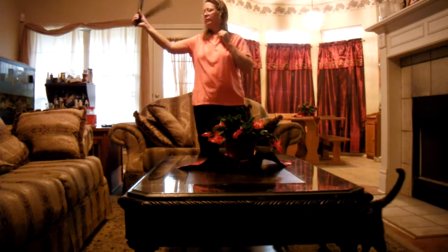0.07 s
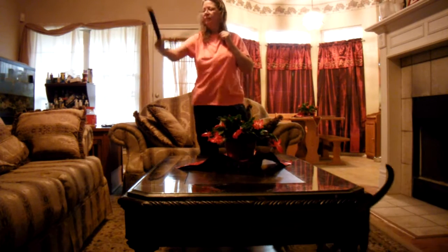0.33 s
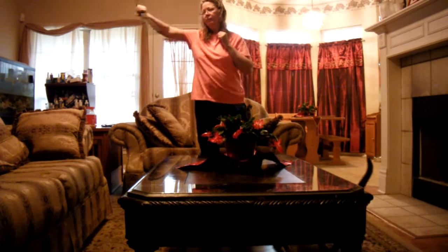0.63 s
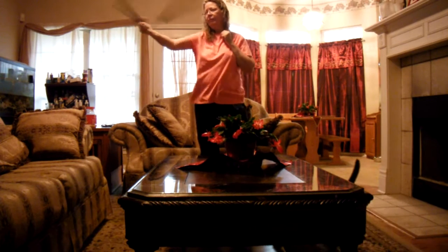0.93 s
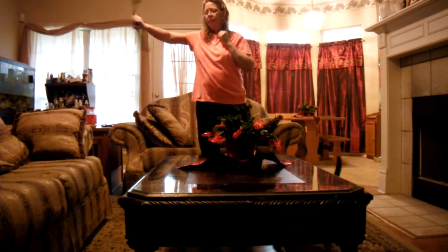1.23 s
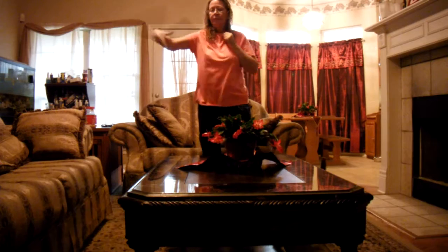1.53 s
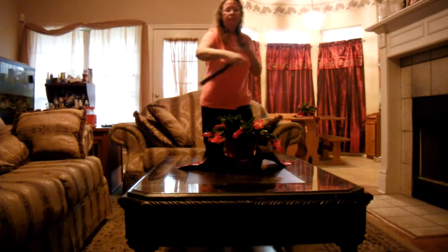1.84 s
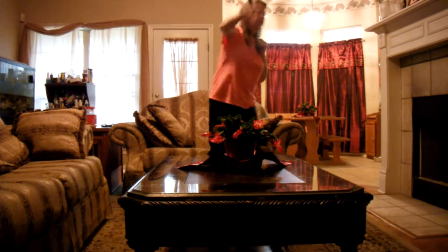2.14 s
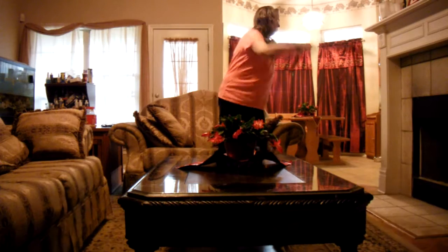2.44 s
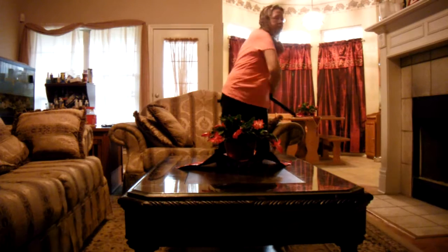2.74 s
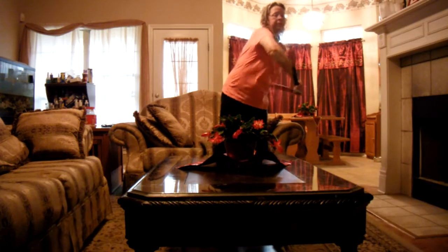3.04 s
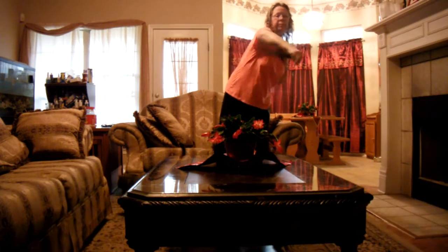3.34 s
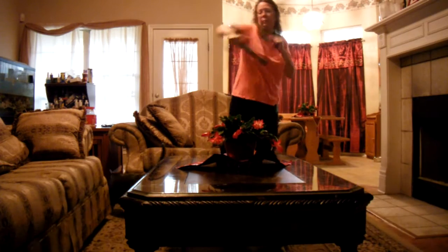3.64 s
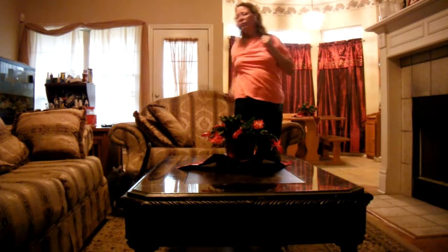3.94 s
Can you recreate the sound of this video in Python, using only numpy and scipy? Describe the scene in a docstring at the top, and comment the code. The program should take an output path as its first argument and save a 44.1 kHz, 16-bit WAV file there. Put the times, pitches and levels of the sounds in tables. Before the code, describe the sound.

Nunchaku swung and caught, with scattered wooden clacks and light chain rattles in a quiet room.

```python
"""Nunchaku are swung and caught in a quiet living room. The wooden sticks clack and ring on impact
and whoosh as they shed eddies; the chain rattles and scrapes as it goes slack and taut.
A stick slaps into the hand, and clothing rustles by friction. Under it lie a steady hiss and a
faint mains hum. One microphone a few metres away hears it all, with the room's reflections."""
import sys
import numpy as np
from scipy import signal
from scipy.fft import rfft, irfft
from scipy.io import wavfile
from scipy.ndimage import uniform_filter1d

SR = 44100
rng = np.random.default_rng(int(sys.argv[2]) if len(sys.argv) > 2 else 0)


def dump(signal):
    """Clip the signal to [-1, 1] and save it as 16-bit WAV at the path in sys.argv[1]."""
    limited = np.clip(np.atleast_2d(signal).T, -1, 1)
    pcm = np.round(limited * 32767).astype(np.int16)
    wavfile.write(sys.argv[1], SR, pcm)


N = 176400
BAND_EDGE_HZ = 7600

# Wood striking wood, or a link snapping tight. Each row: start in seconds, direct peak in dB,
# ring pitch in Hz, relative ring level in dB, ring T60 in seconds, treble gain in dB, room gain in dB.
IMPACTS = [(0.2412, -29.5, 4300, -2, 0.004, -5, -6), (0.2798, -31, 4950, -2, .007, 3, -5),
           (0.433, -30, 3200, 3, 0.0072, -8, -2.5), (0.4505, -31, 3900, 7, 0.0076, -7, -10),
           (0.7678, -20, 2850, -4, 0.0055, -1, -8.5), (1.3490, -25, 4100, -1.5, 0.0065, 5, 1.5),
           (1.35, -22.5, 2800, 4, 0.012, 1, -3), (1.3544, -30, 4200, -5, 0.0072, 4.5, -0.5),
           (1.7797, -10, 3880, -3, 0.0066, 1, 3.5), (1.9866, -29.5, 2800, 5, 0.013, 3, -3),
           (2.046, -34, 2680, -7, 0.0061, -8, -3), (2.0640, -33.5, 4300, -6, .007, -2, -1),
           (2.0929, -31, 2700, -2, 0.0058, -6, -5), (2.523, -35, 3300, 3, .005, -3, 0),
           (2.5482, -34.5, 2300, 4, 0.0031, -11, -3), (3.3452, -34.5, 3320, 4, 0.0061, -8.5, -4),
           (3.4057, -30.5, 2540, -6, 0.0067, -4, 2), (3.4251, -28, 4170, 3, .009, 0, -2),
           (3.4618, -27.5, 4300, 7, 0.0083, 1, -4), (3.4671, -30, 3550, 6, .012, -1.5, -2),
           (3.5350, -30.5, 3500, 12, 0.0031, -5, -10), (3.8393, -26.5, 2500, 3, 0.0024, -4.5, -8)]
# Spectrum of a hard contact. Each row: frequency in Hz, relative level in dB.
CONTACT_SPECTRUM = [(100, -33), (1000, -27), (1550, -18.5), (2300, -2), (3500, -3), (5000, -1.5),
                    (6200, -4), (7000, -12), (7700, -23)]
# Long modes of sticks and links. Each row: frequency in Hz, relative level in dB, T60 in seconds.
LONG_MODES = [(2520, -38.5, .06), (2890, -33, 0.066), (2780, -34, .12), (3480, -28, .13), (3615, -26, .13),
              (3750, -29.5, 0.21), (4080, -37, .12), (4190, -37.5, .1), (4390, -33, .1), (4762, -33, .08),
              (5260, -35.5, 0.094)]
def clacks():
    """Impact excitation: a contact drives long modes and a brief ring set by where it lands."""
    out, t = np.zeros(N), np.arange(6144) / SR
    click = impulse(CONTACT_SPECTRUM + [(2 * BAND_EDGE_HZ, -40)])
    modes = sum(amp(db) * decay(t, t60) * np.cos(2 * np.pi * hz * t) for hz, db, t60 in LONG_MODES)
    for start, db, hz, ring_db, ring_t60, treble_db, room_db in IMPACTS:
        contact = signal.fftconvolve(click, impulse([(2600, 0.021), (5000, treble_db)]))
        ring = amp(ring_db) * decay(t, ring_t60) * np.cos(2 * np.pi * hz * t)
        body = 0.092 * (ring + modes)
        body[0] += 1  # the contact itself is heard too
        hit = signal.fftconvolve(body, contact)
        hit /= abs(band_limit(hit)).max()
        add(out, start, amp(db) * in_room(hit, room_db))
    return out


# Passes of a stick through the air. Each row: centre time in seconds, half length in seconds,
# level in dB, pitch in Hz, half bandwidth in octaves.
SWINGS = [(.258, 0.037, -55, 278, 0.56), (.842, 0.022, -50, 292, 0.47), (1.368, 0.023, -50, 311, 0.31),
          (2.973, 0.017, -41.5, 320, 0.76), (3.003, 0.019, -42.5, 290, 0.75)]
def whooshes():
    """Vortex shedding: eddies behind a stick make a band of noise that swells with its speed."""
    return in_room(noise_bands(SWINGS), room_db=-7.5)[:N]


# Links tumbling. Each row: start, rise time and fade time in seconds, level in dB.
TUMBLES = [(.232, 0.042, 0.028, -47), (.44, 0.016, 0.023, -47.5), (1.347, 0.0071, 0.033, -38.5),
           (2.44, 0.025, 0.061, -52.5), (3.11, .05, 0.028, -55), (3.40, .025, 0.013, -42.5),
           (3.459, 0.0035, 0.034, -42), (3.865, 0.028, .06, -50)]
# Spectrum of one link's tick. Each row: frequency in Hz, relative level in dB.
LINK_SPECTRUM = [(100, -22), (900, -15.5), (1600, -4.5), (2500, -0.5), (3100, -10), (3550, 1), (3850, -4.5),
                 (4350, 0.5), (5500, -3), (6500, -9), (7700, -13.5)]
def chain_rattle(ticks_per_s=620, room_db=-8.5):
    """Shot noise: independent link-on-link collisions merge into showers of ticks."""
    ticks = (rng.random(N) < ticks_per_s / SR) * rng.choice([-1, 1], N)
    rattle = unit(colour(ticks, LINK_SPECTRUM)) * swells(TUMBLES)
    return in_room(rattle, room_db)[:N] / np.hypot(1, amp(room_db))


# The chain sliding. Each row: centre time in seconds, half length in seconds, level in dB,
# pitch in Hz, half bandwidth in octaves.
SLIDES = [(3.02, 0.016, -50.5, 3400, 0.1), (3.06, .03, -55.5, 3420, 0.13), (3.10, 0.021, -54.5, 2750, 0.16),
          (3.155, 0.02, -56, 4170, 0.16)]
def chain_scrapes():
    """Sliding friction: the chain gives off light, narrow bands of high noise."""
    return noise_bands(SLIDES)


# A stick landing in the hand. Each row: start in seconds, level in dB, pitch in Hz, room gain in dB.
CATCHES = [(3.8407, -32.5, 368, 8.5)]
# Spectrum of squeezed air and cloth. Each row: frequency in Hz, relative level in dB.
PUFF_SPECTRUM = [(60, -20), (180, -5.5), (330, 2), (550, -3.5), (800, -11), (1500, -29), (4000, -30),
                 (7700, -32)]
def hand_slap(rise_s=0.00074, puff_db=-8.5):
    """Damped impact: the hand gives a short, low knock and a puff of squeezed air and cloth."""
    out, t = np.zeros(N), np.arange(4096) / SR
    attack = 1 - np.exp(-t / rise_s)
    for start, db, hz, room_db in CATCHES:
        knock = -np.sin(2 * np.pi * hz * t) * decay(t, t60=0.018)
        air = unit(colour(rng.standard_normal(len(t)), PUFF_SPECTRUM))
        puff = amp(puff_db) * air * decay(t, t60=0.068)
        add(out, start, amp(db) * in_room((knock + puff) * attack, room_db))
    return out


# Arm and stick brushing cloth. Each row: start, rise time and fade time in seconds, level in dB.
BRUSHES = [(.215, 0.034, 0.12, -49.5), (2.0, 0.065, 0.051, -53.5), (2.53, 0.022, 0.052, -52.5),
           (2.945, 0.027, 0.14, -48), (3.06, 0.07, 0.074, -54), (3.48, 0.026, 0.064, -52.5),
           (3.86, 0.036, 0.092, -60)]
# Spectrum of rubbed cloth. Each row: frequency in Hz, relative level in dB.
CLOTH_SPECTRUM = [(100, -17), (600, -2), (900, -0.5), (1500, 0), (2600, 2), (3500, -3), (4800, -2.5),
                  (6000, -7), (7700, -16.5)]
def clothing(crease_db=1.5):
    """Friction noise: cloth rustles with the arm, unevenly as it catches on creases."""
    creases = amp(crease_db * wander(300))
    friction = colour(rng.standard_normal(N), CLOTH_SPECTRUM)
    return unit(friction * creases) * swells(BRUSHES)


# Spectrum of the steady hiss. Each row: frequency in Hz, relative spectral density in dB.
HISS_SPECTRUM = [(15, -22), (30, -7), (42, -21), (60, -9.5), (85, 3.5), (105, -2.5), (135, 3), (170, -2),
                 (230, 0), (350, -1.5), (500, -6), (750, -7), (1100, -8.5), (1340, -5.5), (1600, -9.5),
                 (2000, -9.5), (2850, -6.5), (3300, -10), (3850, -11.5), (4450, -7), (5100, -13.5),
                 (6000, -15), (7500, -23.5)]
def hiss(level_db=-49, flicker_db=1.0):
    """Random amplitude modulation: broadband noise flickers slightly in patches of time and pitch."""
    spectra = signal.stft(rng.standard_normal(N), nperseg=512)[2]
    patches = uniform_filter1d(rng.standard_normal(spectra.shape), size=6, axis=0)
    patches = unit(uniform_filter1d(patches, size=6, axis=1))
    noise = signal.istft(spectra * amp(flicker_db * patches))[1][:N]
    return amp(level_db) * unit(colour(noise, HISS_SPECTRUM))


# Tones of the mains hum. Each row: frequency in Hz, rms level in dB.
HUM_TONES = [(60.5, -66), (122, -65)]
def mains_hum():
    """Phase modulation: two low tones waver as their phases drift."""
    t = np.arange(N) / SR
    return sum(amp(db) * np.sqrt(2) * np.sin(2 * np.pi * hz * t + wander(16000)) for hz, db in HUM_TONES)


# Reflections from table, walls and furniture. Each row: delay in seconds, gain relative to the tail.
REFLECTIONS = [(.0016, .15), (.0062, .2), (.0105, .28), (.0146, .25), (.0174, .42), (.022, .26),
               (.032, 0.24), (.0425, .18), (0.0594, .16)]
# Reverberation time. Each row: frequency in Hz, T60 in seconds.
REVERB_TIMES = [(150, 0.44), (500, 0.35), (2000, .42), (3600, 0.54), (5500, 0.32), (7500, 0.45)]
# Spectrum of the reflected sound. Each row: frequency in Hz, gain in dB.
ROOM_SPECTRUM = [(150, -9.5), (2000, -1), (3600, 2), (5000, -0.5), (7500, -1)]
def in_room(x, room_db, build_s=0.007, scatter_s=0.0007):
    """Reverberation: the direct sound is followed by echoes, scattered by furniture, and a diffuse tail."""
    t = np.arange(24576) / SR
    hz, frame_s, spectra = signal.stft(rng.standard_normal(len(t)), SR, nperseg=256)
    spectra *= decay(frame_s, read(REVERB_TIMES, hz)[:, None])
    tail = signal.istft(spectra, SR)[1][:len(t)] * (1 - np.exp(-(t / build_s) ** 2))
    response = tail / np.linalg.norm(tail)
    for delay, gain in REFLECTIONS:
        echo = 0.18 * rng.standard_normal(256) * np.exp(-t[:256] / scatter_s)
        echo[0] += .5 * rng.choice([-1, 1])  # the specular part
        add(response, delay, gain * echo / np.linalg.norm(echo))
    out = amp(room_db) * signal.fftconvolve(x, colour(response, ROOM_SPECTRUM))
    out[:len(x)] += x
    return out


def noise_bands(rows):
    """Band-pass noise under Gaussian envelopes, one for each movement."""
    out, t, hz = np.zeros(N), np.arange(16384) / SR, np.fft.rfftfreq(16384, 1 / SR)
    middle = t.mean()
    for centre_s, half_s, db, pitch, width_oct in rows:
        band = 1 / np.sqrt(1 + (np.log2((hz + 1) / pitch) / width_oct) ** 8)
        envelope = np.exp(-.5 * ((t - middle) / half_s) ** 2)
        noise = irfft(rfft(rng.standard_normal(len(t))) * band) * envelope
        add(out, centre_s - middle, amp(db) * unit(noise) * np.sqrt(np.mean(envelope ** 2)))
    return out


def swells(rows):
    """Incoherent addition: gestures that rise and fade sum in power to one envelope."""
    t, power = np.arange(N) / SR, np.zeros(N)
    for start, rise, fade, db in rows:
        attack = np.clip((t - start) / rise, 0, 1)
        release = np.exp(-np.maximum(t - start - rise, 0) / fade)
        power += (amp(db) * attack * release) ** 2
    return np.sqrt(power)


def amp(db):
    """Decibels to amplitude ratio."""
    return 10 ** (np.asarray(db) / 20)


def unit(x):
    """Normalisation to rms 1."""
    return x / np.sqrt(np.mean(x ** 2) + 1e-20)


def decay(t, t60):
    """Exponential decay by 60 dB in t60 seconds."""
    return np.exp(-np.log(1000) * t / t60)


def wander(samples):
    """A moving average of noise: a slow drift of rms 1."""
    return unit(uniform_filter1d(rng.standard_normal(N), size=samples))


def read(points, hz):
    """Interpolation on a log-frequency axis."""
    f, value = np.transpose(points)
    return np.interp(np.log(hz + 1), np.log(f + 1), value)


def add(mix, start_s, sound):
    """Superposition of a sound on the mix."""
    part = mix[max(round(start_s * SR), 0):][:len(sound)]
    part += sound[:len(part)]


def colour(x, points):
    """Spectral shaping within the microphone's band."""
    hz = np.fft.rfftfreq(len(x), 1 / SR)
    return irfft(rfft(x) * amp(read(points, hz)) / (1 + (hz / (BAND_EDGE_HZ + 500)) ** 40), len(x))


def impulse(points, size=2048):
    """The minimum-phase click that has a given spectrum."""
    log_gain = np.log(amp(read(points, abs(np.fft.fftfreq(size, 1 / SR)))))
    return np.fft.ifft(np.exp(np.conj(signal.hilbert(log_gain)))).real


def band_limit(x):
    """A steep linear-phase low-pass at the band edge."""
    return signal.oaconvolve(x, signal.firwin(601, BAND_EDGE_HZ, window=("kaiser", 8), fs=SR), "same")


def scene():
    """Superposition: all sources sum at one microphone, alike in both channels."""
    nunchaku = clacks() + hand_slap() + whooshes() + chain_rattle() + chain_scrapes()
    return np.tile(nunchaku + clothing() + hiss() + mains_hum(), (2, 1))


def record(dry):
    """Limited bandwidth: the microphone loses the highest treble."""
    return np.array([band_limit(channel) for channel in dry])


dry = scene()
out = record(dry)
dump(out)
```